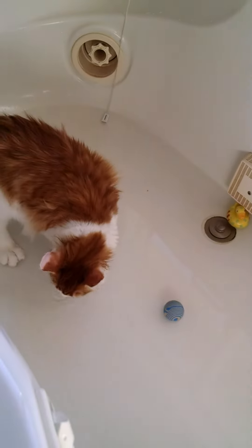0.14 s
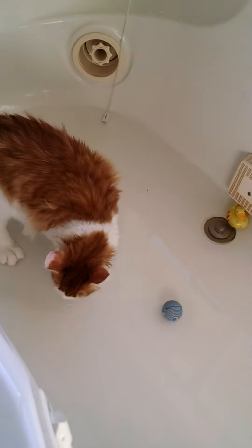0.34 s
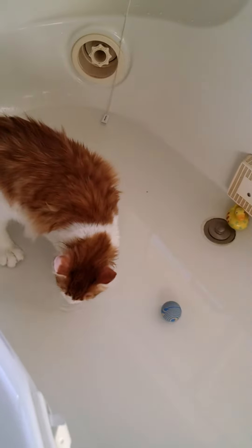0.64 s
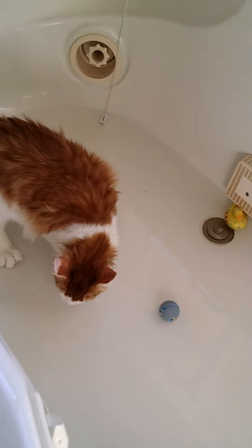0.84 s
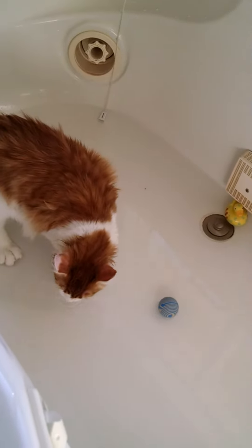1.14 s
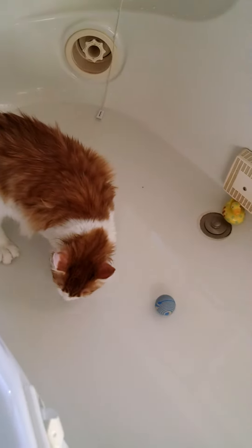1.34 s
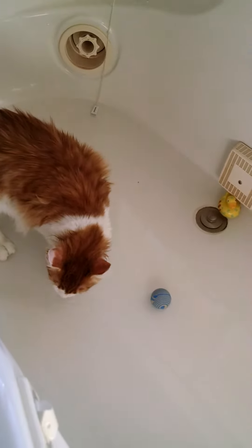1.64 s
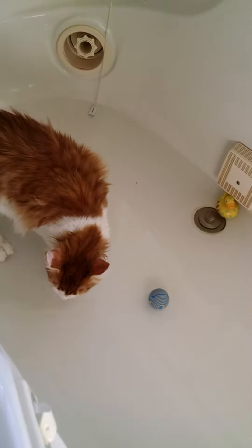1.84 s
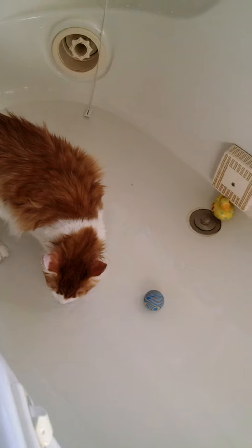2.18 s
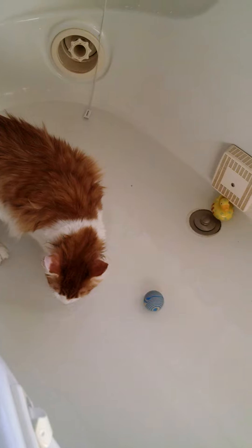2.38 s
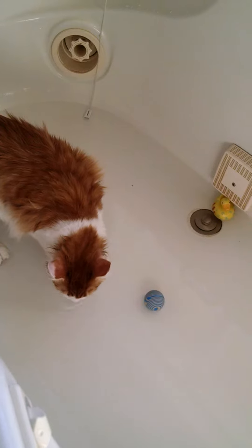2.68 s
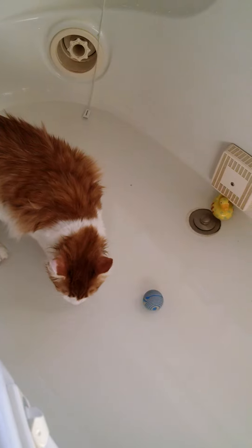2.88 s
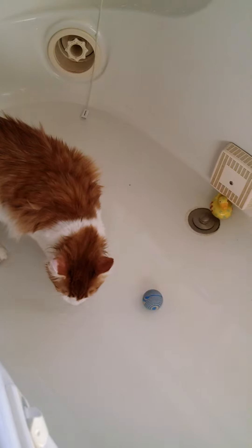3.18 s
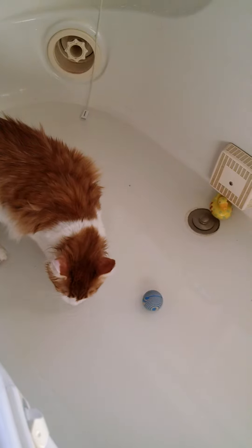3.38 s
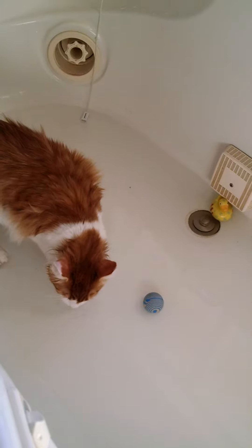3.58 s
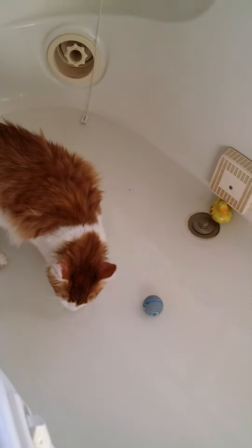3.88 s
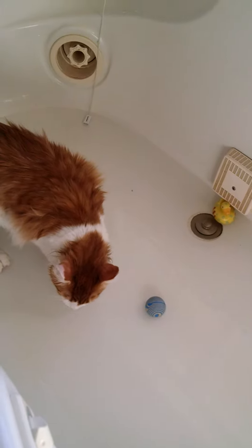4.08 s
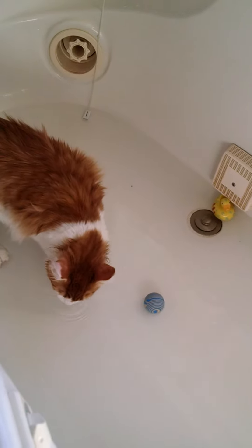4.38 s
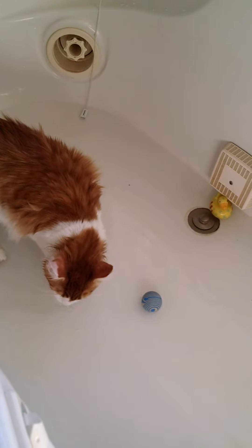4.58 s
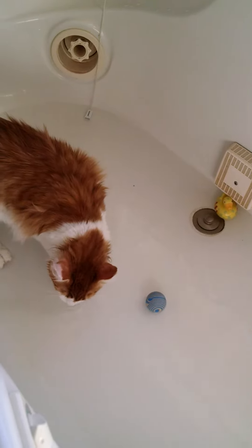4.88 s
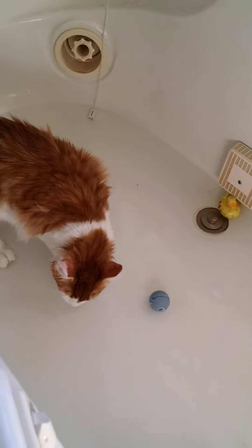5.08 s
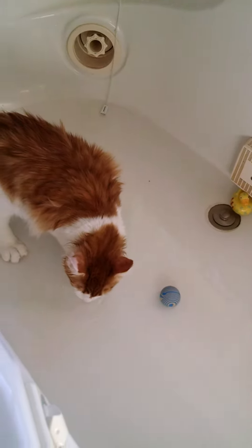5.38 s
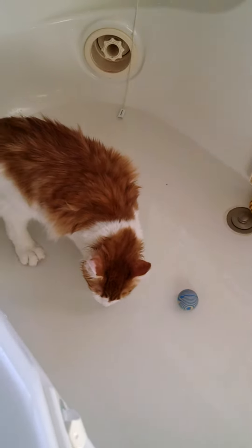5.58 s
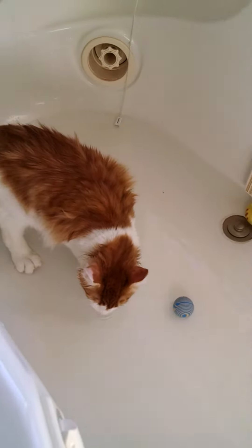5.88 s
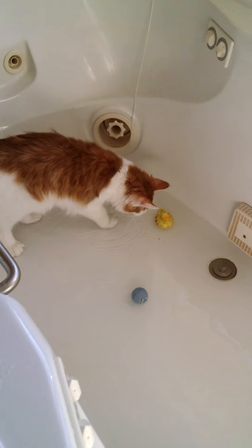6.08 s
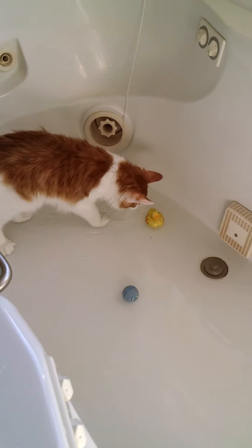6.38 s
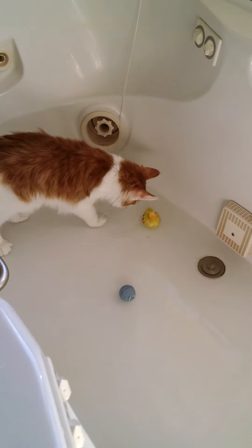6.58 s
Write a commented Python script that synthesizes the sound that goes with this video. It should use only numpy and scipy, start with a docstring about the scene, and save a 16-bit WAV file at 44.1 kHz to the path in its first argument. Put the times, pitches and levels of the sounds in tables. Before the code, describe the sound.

A kitten laps water from a bathtub floor: tiny, irregular wet ticks, some droplet-like, some bright and crackly, with a faint short tub tail. A soft, wavering bathroom hum and slight hiss lie beneath. Past five seconds, fingers knock and scrape the handheld phone, thudding and snapping on the right side. A crisp crackle follows just before the end. Close phone microphone with wide stereo.

```python
"""Kitten lapping in a bathtub

A kitten laps at the wet tub floor: bubbles ring as rising, dying sines, noise cracks and tails give the tub.
The bathroom hums in flickering octave bands of noise, with wavering low tones beneath.
Later, fingers knock and rub a hand-held phone beside its right port: swinging casing, gritty noise, snaps.
Something crisp rustles near the end, as bright scattered grains and a few of the ringing, cracking ticks.
The phone widens its stereo by subtracting each port, delayed, from the other."""
import sys
import numpy as np
from scipy import signal
from scipy.fft import rfft, irfft, next_fast_len
from scipy.io import wavfile
from scipy.ndimage import uniform_filter1d

SR = 44100
rng = np.random.default_rng(int(sys.argv[2]) if len(sys.argv) > 2 else 0)


def inscribe(sig):
    """Save sig as 16-bit PCM at rate SR to the path in sys.argv[1].

    A 1-D sig is mono; a 2-D sig holds one channel per row.
    Samples are clipped to [-1, 1] before scaling.
    """
    pcm = np.round(np.clip(np.atleast_2d(sig).T, -1, 1) * 32767)
    wavfile.write(sys.argv[1], SR, pcm.astype(np.int16))


N = 297090
T = np.arange(N) / SR


def undb(db):
    """Decibels to gain."""
    return 10 ** (np.asarray(db) / 20)


def unit(x):
    """Scale to rms 1."""
    return x / np.sqrt(np.mean(x ** 2))


def colour(x, points):
    """EQ along (Hz, dB) points: a 32 dB drop below the first, the last level held above."""
    size = next_fast_len(len(x))
    hz, db = np.transpose(points)
    log_f = np.log(np.maximum(np.fft.rfftfreq(size, 1 / SR), 1))
    gain = undb(np.interp(log_f, np.log(hz), db, db[0] - 32, db[-1]))
    return irfft(rfft(x, size) * gain, size)[:len(x)]


def walk(rate):
    """Random levels held 1 / rate s and smoothed twice; spread near 1."""
    hold = int(SR / rate)
    steps = np.repeat(rng.standard_normal(N // hold + 1), hold)
    return 1.3 * uniform_filter1d(uniform_filter1d(steps, hold), hold)[:N]


def add(track, s, x):
    """Mix x into the track from time s."""
    i = int(s * SR)
    track[..., i:i + x.shape[-1]] += x[..., :N - i]


def grit(scatter_db):
    """Noise in 40-sample grains of widely differing level."""
    grain_db = scatter_db * np.repeat(rng.exponential(size=N // 40 + 1), 40)[:N]
    return rng.standard_normal(N) * undb(grain_db)


def stroke(s, length, db, rise, fade_db, lift_db_s):
    """Gain of one gesture: a rise, a hold that fades in dB, then a fall at lift_db_s dB per second."""
    t = T - s
    fall = fade_db * np.clip(t / length, 0, 1) + lift_db_s * np.maximum(t - length, 0)
    return undb(db - fall) * np.clip(t / max(rise, 1e-3), 0, 1) ** 2


# bathroom hum and microphone hiss before swell and flicker:
# f/Hz, level/dB (per Hz), likeness of the ports (0-1)
HUM_SPECTRUM = [(22.7, -62, 0.75), (32.8, -77, 0.5), (46, -73, 1), (90, -77, 0.66), (128, -76, 0.84),
                (203, -73, 0.94), (408, -78, 0.67), (583, -81, 0.75), (836, -90.5, 0.35), (874, -86, 0.34),
                (1160, -95, 0), (1720, -99, 0), (2480, -100, 0), (3080, -99.5, 0.42), (3260, -101.5, 0),
                (4060, -102, 0), (7500, -101.5, 0.06), (12400, -100, 0), (15600, -99.5, 0.2)]
# slow ride of the hum's level: t/s, level/dB
HUM_RIDE = [(0, -2), (.8, -4.5), (1.5, -1.5), (2.7, -4.5), (3.4, -3), (5.2, -3), (6.2, 0), (6.74, -1)]


def hum():
    """Noise in octave bands that swell together and flicker alone; the bass is the most alike at both ports."""
    size = next_fast_len(N)
    octave = np.log2(np.maximum(np.fft.rfftfreq(size, 1 / SR), 1))
    hz, db, like = np.transpose(HUM_SPECTRUM)
    like = np.interp(octave, np.log2(hz), like)
    density = undb(np.interp(octave, np.log2(hz), db, -110)) * np.sqrt(SR / 4)
    shared, opposed = rfft(rng.standard_normal((2, size))) * density
    # what the ports share is in phase, the rest has opposite signs
    pair = shared * np.sqrt(1 + like) + opposed * np.sqrt(1 - like) * np.array([[1], [-1]])
    out, swell = 0, walk(4.2)
    for centre in np.arange(4, 15.):  # bands from 16 Hz to 16 kHz
        share = np.cos(np.pi / 2 * np.clip(octave - centre, -1, 1)) ** 2
        flicker_db = 1.6 if centre < 11 else .6  # the hiss is steadier than the hum
        band = irfft(pair * share, size)[:, :N]
        out = out + band * undb(.5 * swell + flicker_db * walk(6))
    ride_db = np.interp(T, *np.transpose(HUM_RIDE))
    return out * undb(ride_db + np.array([[0.], [.6]]))  # the right port is slightly louder


# wavering low tones: f/Hz, level/dB (rms)
LOW_TONES = [(41, -67), (120, -63), (387, -64.5)]


def tones():
    """Faint sines from the building whose level and phase wander, so they come and go."""
    out = np.zeros(N)
    for hz, db in LOW_TONES:
        level = undb(db) * np.sqrt(2) * unit(walk(14))
        out += level * np.sin(2 * np.pi * hz * T + 3 * walk(6))
    return out


def bubbles(hz, t60_ms, chance):
    """A bubble and three smaller neighbours bursting up to 2 ms later, each rising in pitch near the surface."""
    late = np.append(0, .002 * chance[0])[:, None]
    pitch = hz * np.append(1, 1 + .24 * (chance[1] - .5))[:, None]
    size = np.append(1, .15 + .35 * chance[2])[:, None]
    t = np.maximum(T[:1300] - late, 0)
    ring = np.sin(2 * np.pi * pitch * t * (1 + 10 * t))
    decay = np.exp(-np.log(1000) * t * 1000 / t60_ms)
    return np.sum(size * ring * decay, axis=0)


FAINTEST_DB, FAINT_PER_S, FAINT_TAIL_DB = -56.5, 14, -29


def faint_laps():
    """Stray droplets at random moments, pitches and levels, as rows like those of the tick table."""
    when, pitch, size = rng.random((int(FAINT_PER_S * N / SR), 3)).T
    return [(a * (N - 1) / SR, FAINTEST_DB + 6 * c, 1200 * 9 ** b, 0, 0, FAINT_TAIL_DB)
            for a, b, c in zip(when, pitch, size)]


# the clearer ticks: wet ones from the lapping, and near 6.3 s bright crackles of the rustle:
# t/s, level/dB, ring f/Hz, second ring f/Hz (0 = none),
# crack level/dB (peak, relative to the tick), tub tail level/dB (relative to the tick)
TICKS = [(0.169, -44, 10800, 2030, 3, -29), (0.4066, -50.5, 1740, 0, -10, -32),
         (0.471, -48.5, 10300, 1380, 6.5, -29), (0.646, -47.5, 1940, 0, 1, -29),
         (0.678, -43.5, 11700, 0, 3, -29), (1.161, -40.5, 1800, 0, -20, -35.5),
         (1.223, -34.5, 14000, 10800, -4, -41), (1.2472, -52, 4250, 6800, 17, -26.5),
         (1.323, -47, 1190, 0, -12, -30), (1.343, -39, 1940, 0, -20, -40),
         (1.4474, -39, 15160, 13440, -20, -39), (1.477, -43.5, 9700, 1210, -7, -33),
         (1.5664, -45, 11200, 13440, 6, -33), (1.63, -48, 6400, 3620, -5, -33),
         (2.079, -47.5, 2620, 0, 3, -26.5), (2.38, -53, 4820, 6150, 1, -26.5),
         (2.687, -54, 8250, 9990, 13.5, -24.5), (2.851, -40.5, 10700, 0, -9, -33.5),
         (3.0287, -50.5, 7000, 1500, 16, -30.5), (3.039, -52, 7040, 11500, 0, -25),
         (3.044, -49, 1300, 3500, -12, -30), (3.067, -45.5, 1190, 0, -15, -39),
         (3.2405, -32.5, 11700, 10000, -3, -33.5), (3.244, -43, 6500, 2, -15, -28.5),
         (3.2515, -35, 9800, 12100, -4, -30.5), (3.289, -48, 3460, 4300, -1, -28),
         (3.4774, -39, 4460, 7462, -13, -36.5), (3.4903, -38.5, 13600, 4500, 5, -33),
         (3.536, -47, 1900, 0, -10, -33), (3.543, -48, 6130, 3500, 8, -29.5),
         (3.7303, -41.5, 7000, 12000, 11, -30.5), (3.733, -39, 8050, 9800, 0, -35),
         (3.7446, -45, 9500, 6500, 9, -33), (3.801, -43, 9300, 0, -5, -32),
         (4.015, -46, 5460, 8000, -4, -29.5), (4.071, -44.5, 6450, 0, 8.5, -27.5),
         (4.1655, -40.5, 1050, 1800, -16, -32), (4.166, -35, 2480, 0, -20, -38),
         (4.1657, -48.5, 3380, 4200, -10, -35), (4.35, -45, 2000, 4000, 9, -32.5),
         (4.37, -44.5, 1870, 0, 9, -30), (4.612, -43, 4560, 0, 1, -31),
         (4.87, -51.5, 4250, 9000, 15.5, -25.5), (4.9444, -46, 1650, 6502, 11, -29.5),
         (5.038, -46, 3060, 4002, -16, -34), (5.21, -44.5, 1440, 1900, -12, -39),
         (5.222, -37, 10200, 13260, -14, -32), (5.2573, -46, 11600, 14810, -9, -30),
         (6.082, -42, 2200, 7040, 10, -32), (6.087, -41, 11700, 9500, -3, -32),
         (6.284, -43, 10100, 13090, -11, -30), (6.303, -37, 14500, 8000, -10, -44),
         (6.3048, -25, 12400, 14500, -15, -42), (6.3105, -31, 14000, 9500, 1, -34),
         (6.306, -45.5, 4030, 3500, -18, -28.5), (6.345, -42, 9000, 6500, 0, -34),
         (6.373, -38, 9900, 11020, -6, -26), (6.68, -50.5, 1580, 1000, -12, -29)]
RING_MS_AT_1K, RING_SLOPE = 11.3, 0.35  # T60 at 1 kHz; high rings die sooner, as small bubbles do
SECOND_DB = -3.5  # second ringing cluster against the first
CRACK_S, CRACK_BODY = .00015, 0.72  # decay time; share of unsharpened noise
NEAR_WALLS_S, TUB_T60_S = .003, 0.39


def ticks():
    """Each tick cracks, rings as one or two bubble-like clusters and lingers, grainy, between the tub walls."""
    out, t, rows = np.zeros((2, N)), T[:SR // 4], TICKS + faint_laps()
    noises = rng.standard_normal((len(rows), 4, len(t)))
    chances = rng.random((len(rows), 2, 3, 3))
    for (s, db, hz, hz2, crack_db, tail_db), noise, chance in zip(rows, noises, chances):
        ring_ms = RING_MS_AT_1K * (hz / 1000) ** -RING_SLOPE
        tick = bubbles(hz, ring_ms, chance[0]) + undb(SECOND_DB) * bubbles(hz2, ring_ms, chance[1])
        burst = noise[2, :1300]
        crack = (np.gradient(burst) + CRACK_BODY * burst) * np.exp(-t[:1300] / CRACK_S)
        tick += undb(crack_db) * crack / np.max(abs(crack))
        grain = undb(3.9 * np.repeat(noise[3, ::100], 100)[:len(t)])
        # the near walls answer within milliseconds, the whole tub dies away after them
        fade = np.exp(-t / NEAR_WALLS_S) + np.exp(-np.log(1000) * t / TUB_T60_S) * grain
        tail = noise[:2] * fade * undb(tail_db)
        tail[0, 0], tail[1, 6] = 1, .6  # direct sound: right port 6 samples later and weaker
        add(out, s, undb(db) * signal.fftconvolve(tail, tick[None], axes=1))
    return out


FIRM_MS = 4.5  # contacts longer than this count as soft presses


def press(ms):
    """Force of a fingertip on the casing: quick in, slow out; a long press also builds slowly."""
    skew = 0.66 * max(ms / FIRM_MS, 1) ** 0.84
    return np.sin(np.pi * np.linspace(0, 1, max(int(ms * SR / 1000), 8)) ** skew) ** 2


# knocks on the casing: t/s, level/dB (of the force), contact/ms, direction (+1 or -1),
# tug level/dB (relative to the push, weaker still under soft presses)
CASING_KNOCKS = [(4.1244, -28.5, 4.8, -1, -11), (4.18, -30.5, 5.6, -1, -3), (4.329, -37, 5.7, 1, -6),
                 (4.374, -33.5, 2.2, -1, -5), (4.786, -38.5, 4.4, -1, -4), (4.8406, -32.5, 6.8, -1, -6),
                 (4.906, -38, 2.6, -1, -8), (5.3958, -10, 1.94, 1, -33), (5.4765, -15.5, 3.2, 1, -6),
                 (5.48, -14, 2.5, 1, -1), (5.482, 2.5, 2.2, 1, -2), (5.508, -36, 4.1, 1, -6),
                 (5.7195, -12, 14.8, -1, -30), (5.7422, -20, 2.4, 1, 1), (5.768, -33, 1.4, 1, -9),
                 (5.839, -25, 2.6, -1, -9), (5.909, -29, 2.8, 1, -11), (6.098, -30, 1.4, 1, -10),
                 (6.1051, -30.5, 1.25, 1, -5), (6.15, -23, 2.5, 1, -15)]
CASING_HZ, CASING_WIDTH_HZ = 130, 63  # resonance under a firm knock, and its bandwidth
SWING_AT_0DB = 0.6  # the harder the knock, the more of it sets the whole casing swinging
TUG_SHARE, TUG_LEAD = 0.45, 0.28  # length and lead of the opposite tug, in (firm) contacts


def knocks():
    """A short tug, then a push the other way, drives the damped casing, which swings back."""
    out = np.zeros(N)
    for s, db, ms, way, tug_db in CASING_KNOCKS:
        push, firm = np.zeros(4000), min(ms, FIRM_MS)
        softness = (firm / ms) ** 2
        lead_s = TUG_LEAD * firm / 1000
        add(push, 0, -undb(tug_db) * softness * press(TUG_SHARE * firm))
        add(push, lead_s, press(ms))
        w = 2 * np.pi * CASING_HZ * firm / ms  # under a long, soft press the casing swings slower
        share = min(SWING_AT_0DB * undb(db) * softness, 1)
        # a blend of high-pass and band-pass around one resonance
        casing = signal.bilinear([1 - share, share * w, 0], [1, 2 * np.pi * CASING_WIDTH_HZ, w * w], SR)
        add(out, s - lead_s, np.sign(way) * undb(db) * signal.lfilter(*casing, push))
    return np.array([np.zeros(N), out])


# strokes of the fingers on the casing: t/s, length/s, hiss level/dB, rumble level/dB, rise/s,
# fade over the stroke/dB
FINGER_STROKES = [(5.392, 0.12, -42.5, -30, 0.0026, 12), (5.59, 0.1, -39.5, -37, 0.031, 0.5),
                  (5.718, 0.056, -46, -39, 0.0092, -0.5), (5.781, 0.048, -48.5, -40.5, 0.0091, 1),
                  (5.832, 0.21, -51, -44, 0.014, 4)]
# tone of the sliding hiss: f/Hz, level/dB (relative, per Hz)
RUB_TONE = [(900, -5), (1500, -1), (2500, -5.5), (3300, -7.5), (4500, -4), (7000, -5.5), (10000, -12.5),
            (15000, -15.5)]
# tone of the rumble under it: f/Hz, level/dB (relative, per Hz)
RUMBLE_TONE = [(40, 6), (100, 6.5), (200, 5.5), (400, 5.5), (700, -1.5), (1100, -7), (1800, -29)]
LIFT_DB_S, RUMBLE_LIFT_DB_S = 500, 305  # how fast hiss and rumble die when the finger lifts
FAR_PORT_DB = -15  # the hiss also reaches the left port, late, through the casing


def rubs():
    """Sliding skin gives gritty, uneven hiss over a rumble."""
    hiss_gain, rumble_gain = np.zeros(N), np.zeros(N)
    for s, length, hiss_db, rumble_db, rise, fade in FINGER_STROKES:
        hiss_gain += stroke(s, length, hiss_db, rise, fade, LIFT_DB_S)
        rumble_gain += stroke(s, length, rumble_db, rise, fade, RUMBLE_LIFT_DB_S)
    hiss = hiss_gain * unit(colour(grit(1.06), RUB_TONE)) * undb(0.89 * walk(150))
    rumble = rumble_gain * unit(colour(rng.standard_normal(N), RUMBLE_TONE)) * undb(2.0 * walk(80))
    far = np.roll(hiss, 90) * undb(FAR_PORT_DB)  # 90 samples, about 2 ms
    return np.array([far, hiss + rumble])


# brittle snaps of the casing: t/s, level/dB (before the tone), length/ms
CASING_SNAPS = [(5.396, -26.5, 1.4), (5.4765, -41, 6.8), (5.4814, -24, 10), (5.508, -41, 11.4),
                (5.7415, -50, 2.8), (5.838, -42, 4), (6.098, -46, 3.5), (6.15, -52, 2)]
# tone of the snaps: f/Hz, level/dB (gain)
SNAP_TONE = [(800, 0), (2500, -3), (5000, 4), (8000, 2.5), (15000, -9.5)]


def snaps():
    """Brittle casing snaps under some knocks: coloured noise bursts that hold, then stop quickly."""
    out, t_ms = np.zeros(N), T[:900] * 1000
    for s, db, ms in CASING_SNAPS:
        add(out, s, undb(db) * rng.standard_normal(900) * np.exp(-(t_ms / ms) ** 4))
    return np.array([np.zeros(N), colour(out, SNAP_TONE)])


# tone of the rustle: f/Hz, level/dB (relative, per Hz)
RUSTLE_TONE = [(1000, -4.5), (3500, -11), (5000, -5.5), (7000, 2.5), (10000, 3.5), (12500, 1), (15000, 2.5)]
RUSTLE_S, RUSTLE_DB = 6.294, -42.5  # start; level at the left port
RUSTLE_RISE_S, RUSTLE_LENGTH_S, RUSTLE_LIFT_DB_S = 0.017, 0.09, 260


def rustle():
    """Dense bright crackle of scattered grains, unrelated at the two ports."""
    gain = stroke(RUSTLE_S, RUSTLE_LENGTH_S, RUSTLE_DB, RUSTLE_RISE_S, 0, RUSTLE_LIFT_DB_S)
    return np.array([unit(colour(grit(2.7), RUSTLE_TONE)) * gain * undb(side_db) for side_db in (0, -1.5)])


def scene():
    """Pressure at the left and right ports."""
    return hum() + tones() + ticks() + knocks() + rubs() + snaps() + rustle()


# how the phone crosses its ports: f/Hz, share of the right taken from the left (0-1),
# share of the left taken from the right (0-1), right port level/dB
PORT_CROSSING = [(1000, 0.77, 0.7, 0.5), (2460, 0.88, 0.93, 0), (4870, 0.63, 0.29, 0.5),
                 (7260, 0.4, 0.021, -1), (10900, 0.44, 0.015, -1.5), (15000, 0.68, .05, -.3)]
PORT_LAG_S = 17.45 / 44100
TOP_HZ = 15450


def record(dry):
    """Each side loses a delayed copy of the other port, by a share that varies with pitch; the top is cut."""
    size = next_fast_len(N + 64)
    f = np.fft.rfftfreq(size, 1 / SR)
    hz, *columns = np.transpose(PORT_CROSSING)
    from_left, from_right, right_db = (np.interp(f, hz, column) for column in columns)
    ports = rfft(dry, size)
    lag = np.exp(-2j * np.pi * f * PORT_LAG_S)
    crossed = ports[::-1] * lag * np.array([from_left, from_right])
    wide = irfft(ports * undb([0 * f, right_db]) - crossed, size)[:, :N]
    return signal.sosfilt(signal.ellip(10, .2, 60, TOP_HZ, fs=SR, output="sos"), wide)


dry = scene()
out = record(dry)
inscribe(out)
```